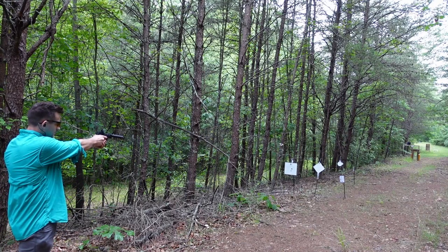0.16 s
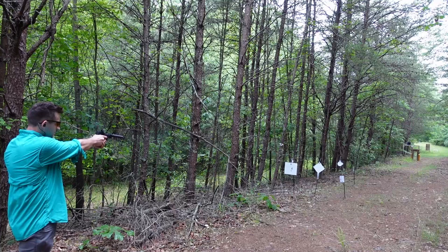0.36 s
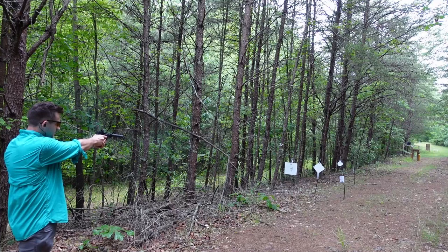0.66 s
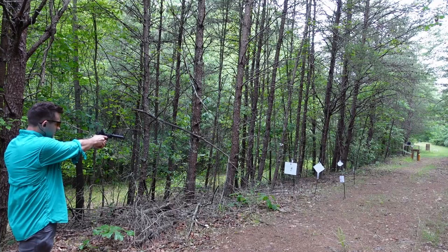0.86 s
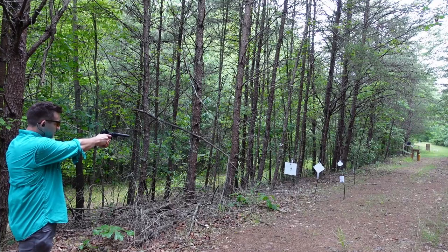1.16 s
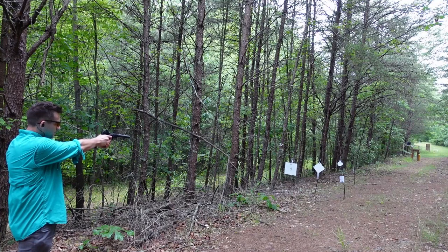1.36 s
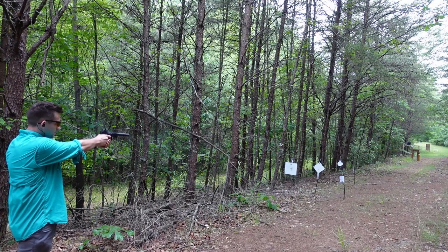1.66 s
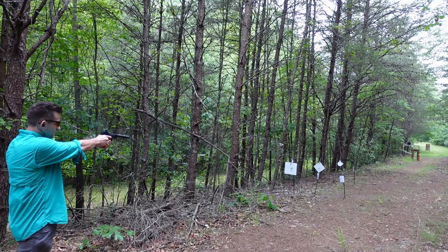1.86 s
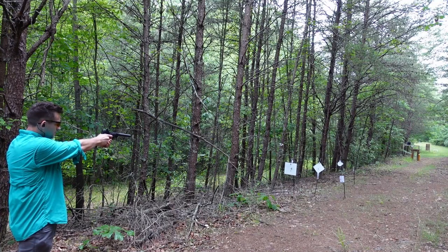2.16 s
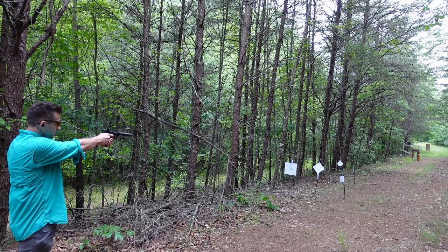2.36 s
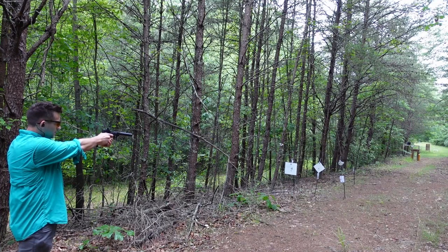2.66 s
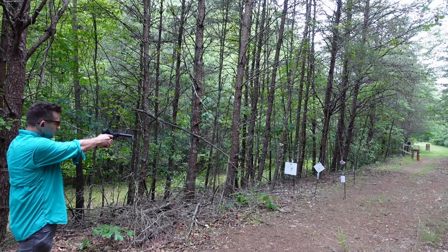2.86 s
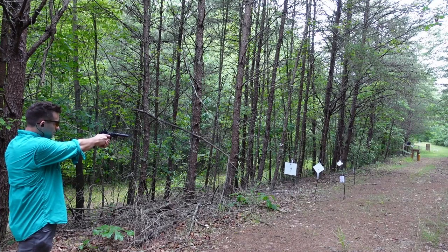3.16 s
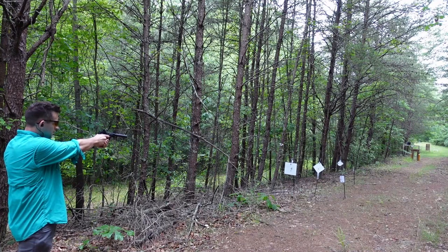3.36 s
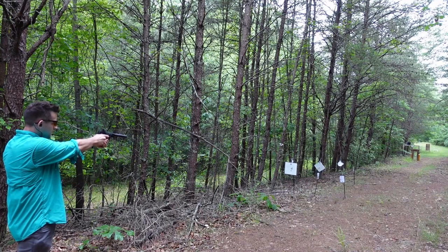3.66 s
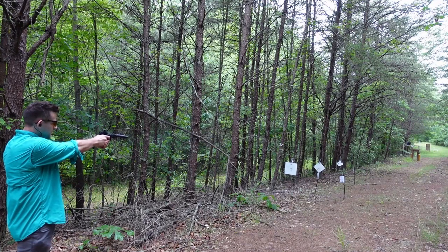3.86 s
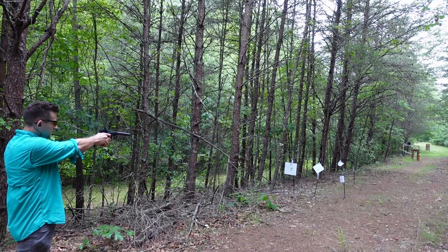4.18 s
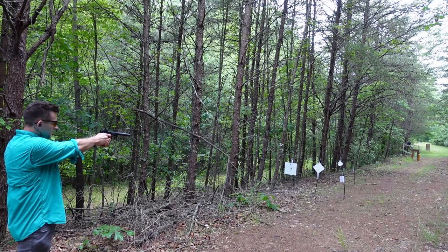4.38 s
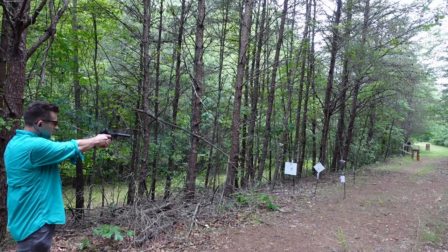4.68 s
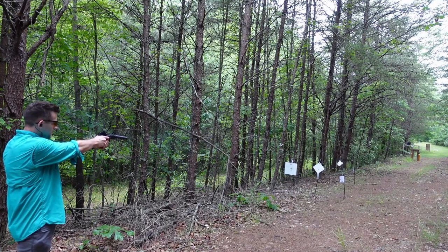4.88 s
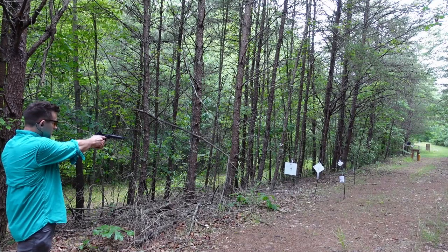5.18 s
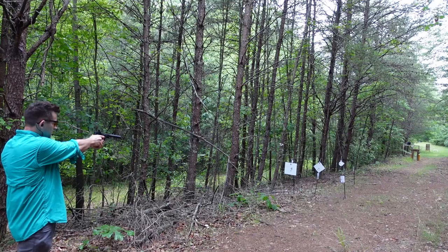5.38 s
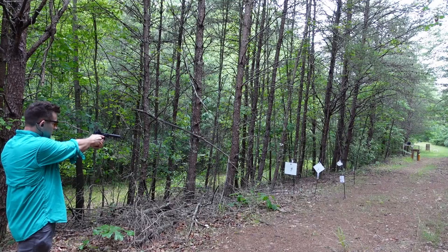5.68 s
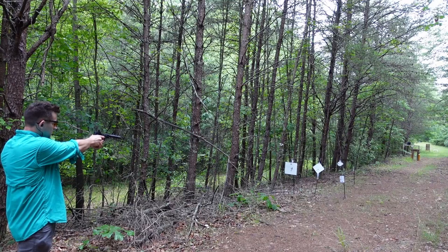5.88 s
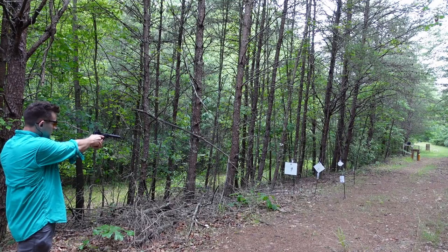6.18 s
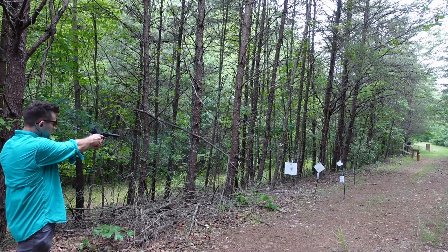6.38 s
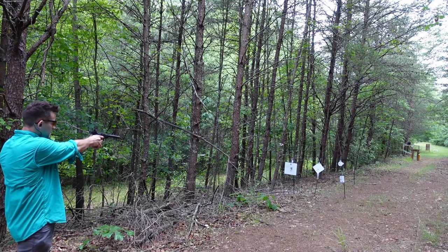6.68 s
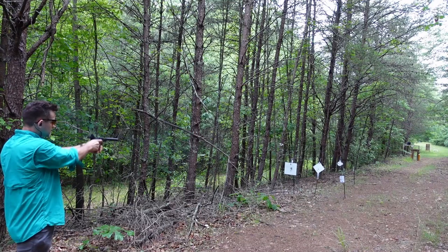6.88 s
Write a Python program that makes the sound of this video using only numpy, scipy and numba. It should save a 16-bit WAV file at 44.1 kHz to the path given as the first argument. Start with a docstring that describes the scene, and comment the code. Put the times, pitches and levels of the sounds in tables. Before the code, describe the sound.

Over a light outdoor breeze, nine pistol shots crack and echo among trees, each striking a steel target that rings and fades. The opening pair and the fast final three ring lower and longer; the four slower shots between them ping higher. Faint trigger clicks, a sharp knock and a skipping brass case fill the gaps. The microphone behind the shooter overloads briefly on the shots.

```python
"""First comes the ring of a steel plate and the echo of a pine wood, from a shot fired just before.
A small-bore pistol keeps firing at three hanging plates: the trigger ticks, the shot cracks, the
slide slams shut, and the plate clanks and rings while the trunks scatter the bang. Between shots come
small clicks, one knock and a skipping case, over a soft breeze. A camera behind the shooter clips
on each crack and turns itself down."""
import sys
import numpy as np
from scipy import signal
from scipy.fft import rfft, irfft, next_fast_len
from scipy.io import wavfile
from scipy.ndimage import map_coordinates
from numba import njit

SR = 44100
rng = np.random.default_rng(int(sys.argv[2]) if len(sys.argv) > 2 else 0)


def transcribe(u):
    """Save the signal u as a 16-bit wav file named by the first command-line argument.

    u: samples, shape (n,) or (channels, n), limited to [-1, 1]; the rate is SR.
    q: integer samples, one column per channel.
    """
    v = np.clip(np.atleast_2d(u).T, -1, 1)
    q = np.round(v * 32767).astype(np.int16)
    wavfile.write(sys.argv[1], SR, q)


N = 310023


def amp(db):
    """Turn decibels into a gain."""
    return 10 ** (np.asarray(db) / 20)


def clock(seconds):
    """Sample times from zero."""
    return np.arange(int(seconds * SR)) / SR


def add(track, s, sound):
    """Mix a sound into the track at s seconds."""
    start = round(s * SR)
    part = sound[max(-start, 0):max(N - start, 0)]
    track[max(start, 0):][:len(part)] += part


def noise(colour, size):
    """Noise of strength (rms) 1; the colour table says which pitches are stronger than others."""
    hz, db = np.transpose(colour)
    m = next_fast_len(size)
    gains = amp(np.interp(np.log(np.fft.rfftfreq(m, 1 / SR) + 1), np.log(hz), db))
    x = irfft(rfft(rng.standard_normal(m)) * gains, m)[:size]
    return x / x.std()


def wobble(t, rate):
    """A smooth curve through `rate` random values a second."""
    return map_coordinates(rng.standard_normal(size=4096), [t * rate], order=2, mode="mirror")


def burst(colour, t, t60, hold=0):
    """Noise that stays level for `hold` seconds, then fades by 60 dB every t60 seconds."""
    return noise(colour, len(t)) * amp(-60 * np.maximum(t - hold, 0) / t60)


def ring(tones, t):
    """The fading tones of something struck once."""
    return sum(amp(db - 60 * t / t60) * np.sin(2 * np.pi * hz * t) for hz, t60, db in tones)


# noise colours of a click, the blast, nearby brush and the slide: f/Hz, level/dB
CLICK_COLOUR = [(200, -10), (1500, -5), (4000, -9), (8000, -6.5), (13000, -21.5), (16000, -17.5)]
BLAST_COLOUR = [(30, -4.5), (90, -4), (170, -16.5), (250, 5.5), (400, -10), (900, 1.5), (2500, -8),
                (6500, -0.5), (10000, -4.5), (16000, -37.5)]
BRUSH_COLOUR = [(60, -14), (300, 7.5), (900, 6.5), (2500, 6.5), (6500, 4), (10000, -3.5), (16000, -6.5)]
SLIDE_COLOUR = [(50, -30), (300, -16), (900, 5.5), (3000, 5), (7000, -15.5), (11000, -40), (16000, -30.5)]
# the shots: t/s, blast level/dB, echo level/dB, plate aimed at, spot struck (0-2), hit level/dB
SHOTS = [(-.165, -7.5, 6, "square", 0, -7.5), (0.2288, 2, 5, "square", 1, -1),
         (.660, 3.5, 8, "square", 2, -2.5), (1.6836, -4, 6, "diamond", 0, -2.5),
         (2.660, -2, 5, "small", 0, -0.5), (3.541, -3.5, 4.5, "diamond", 1, -1.5),
         (4.5175, -2, 4.5, "small", 1, -6), (5.6641, -1.5, 5.5, "square", 0, -11.5),
         (6.0423, -1, 3.5, "square", 1, -1.5), (6.3552, -2, 1, "square", 2, -10.5)]


def pistol(blast_db=13, ground_db=9, brush_db=-7, forest_db=-5, striker_db=-18):
    """The striker clicks, gas bursts from the barrel, and ground, brush and trees throw the bang back."""
    out, t = np.zeros(N), clock(0.5)
    for s, db, echo_db, *_ in SHOTS:
        add(out, s - 0.0024, amp(striker_db) * burst(CLICK_COLOUR, t, t60=0.03))
        add(out, s, amp(db + blast_db) * burst(BLAST_COLOUR, t, t60=0.013, hold=0.0017))
        add(out, s + 0.0027, amp(db + ground_db) * burst(BLAST_COLOUR, t, t60=0.013, hold=0.00074))
        add(out, s + 0.003, amp(db + brush_db) * burst(BRUSH_COLOUR, t, t60=0.31))
        for delay in (0.0228, 0.0252):  # the slide picks up the next round, then slams shut
            add(out, s + delay, burst(SLIDE_COLOUR, t, t60=0.016))
        add(out, s, amp(echo_db + forest_db) * forest(clock(3)))
    return out


# noise colour of the wood's echo: f/Hz, level/dB
FOREST_COLOUR = [(60, -36), (260, -25), (450, -6), (800, -1.5), (1400, 2.5), (3000, 2), (6500, 7),
                 (10000, 4), (16000, -7)]
# thick trunks, each with a slap of its own: t/s after the shot, level/dB above the other echoes
THICK_TRUNKS = [(.132, 3.5), (.159, 10), (0.183, 6), (0.32, 2)]


def forest(t, rise_s=0.019, thinning_s=0.076, tree_line_s=0.19, slap_s=0.00396, air_db_per_khz_s=9.5):
    """Echoes from countless trunks swell, then thin out while the air soaks up the treble."""
    hz, when, spectrum = signal.stft(noise(FOREST_COLOUR, len(t)), SR, nperseg=256)
    air_loss = amp(-air_db_per_khz_s * hz[:, None] / 1000 * when)
    echoes = signal.istft(spectrum * air_loss, SR, nperseg=256)[1][:len(t)]
    swell = 1 - np.exp(-t / rise_s)
    fade = (1 + (t / thinning_s) ** 6) ** (-0.94 / 6)
    bumps_db = wobble(t, rate=300) + np.exp(-((t - tree_line_s) / 0.049) ** 2)
    for delay, db in THICK_TRUNKS:
        bumps_db += db * (t > delay) * np.exp(-np.abs(t - delay) / slap_s)
    return echoes * swell * fade * amp(bumps_db)


# the tones of each plate: f/Hz
SQUARE_HZ = [614.5, 890.0, 1220.0, 1545.0, 1571.5, 1954.5, 2630.0, 3093.5, 3780.0, 4173.0, 4891.0, 4977.0,
             5322.0, 5926.5, 5981.0, 6815.5, 7178.0, 7259.5, 7370.0, 8348.0, 8688.0, 8724.0, 9375.0, 9917.0,
             10338.0, 11063.0, 12180.0, 12902.0, 13335.0, 13558.0, 14906.0, 15520.0]
DIAMOND_HZ = [1180.0, 1359.5, 1362.0, 1951.0, 3343.0, 3387.0, 3459.0, 3772.0, 4238.0, 5586.0, 5605.0,
              6221.0, 6512.0, 6925.0, 7006.0, 7922.0, 8429.0, 8721.0, 10022.0, 10997.0, 11078.0, 12350.0,
              14812.0, 15499.0]
SMALL_HZ = [3000, 4180, 9525, 9540]
# how those tones ring (the shortest is the clank): fade t60/s, then level/dB for each spot struck
SQUARE_RING = [(5.09, -5, -22, -11), (6.54, -16.5, -47.5, -28.5), (0.0054, 21, 24, 27),
               (1.43, 7, -3, -13.5), (1.31, -6, -12, -10), (1.06, -4, -3.5, -18.5),
               (1.56, -11, -17.5, -29.5), (0.8, 0, -11, -1), (0.89, -39, -12.5, -39), (0.86, -6, -16, -5.5),
               (0.54, 7, -1.5, -11.5), (0.79, -9, -9.5, -10.5), (0.8, -14, -8.5, -13), (0.58, 6, 2, -5.5),
               (.38, -16, -9, -5), (0.71, 0, -27, -3.5), (.55, -21, -25, -6), (0.71, -9, -3.5, -14),
               (0.59, -23, -17, -3.5), (.52, 3.5, -13.5, 8.5), (.39, 20, 0, -2.5), (0.65, -13, -17, -6),
               (0.6, -2, -25, -8), (0.36, 4, -12.5, -19.5), (0.66, -17.5, -10.5, -18),
               (0.5, -0.5, -15, -14), (0.52, -4.5, -7.5, -26), (.5, -19.5, -20.5, -7.5),
               (0.3, 10.5, -21, -28), (.44, 14, -12.5, -9), (.43, -25.5, -16.5, -6.5), (0.25, 7, -8, -26.5)]
DIAMOND_RING = [(0.0048, 27, 17), (2.04, -25.5, -30), (0.24, 10, -5.5), (1.02, -17.5, -19), (0.64, -1, -9),
                (0.79, -9.5, -7), (1.11, -15, -26), (0.4, -20, -11), (0.65, -13.5, -7.5), (0.78, -3.5, -17),
                (0.64, -13, -13.5), (0.37, -24.5, 0.5), (0.71, -8, -10.5), (0.5, -11, 2.5), (.6, -10, -23),
                (0.71, -7, -13.5), (0.43, -7, -1.5), (.55, -7, -5), (0.52, -11.5, -13.5), (0.48, -20.5, -6),
                (0.63, -9.5, -23), (0.46, -3, -7.5), (0.41, -6, -14), (0.46, -10, -19)]
SMALL_RING = [(0.0031, 20.5, 6), (0.32, -14, -3.5), (0.09, 5.5, 8.5), (0.69, -19, -18)]
# noise colour of a bullet slapping steel: f/Hz, level/dB
SLAP_COLOUR = [(30, -32.5), (250, -44), (600, 2.5), (1200, -7.5), (2200, -3.5), (8000, -13), (16000, -13)]
FLIGHT_S = 0.0344  # the bullet flies out and the sound of its hit comes back
SWING_S, SWING_DB = 0.57, 4.5  # a struck plate turns away and back; its treble dips meanwhile


def plate(name, pitches, rings, level_db, echo_db, slap_db, shimmer_db, flutter_db, sway_db=2.3):
    """Each bullet slaps the steel and feeds its tones; the spot it hits sets how much each one gets."""
    hits = [(s + FLIGHT_S, spot, db) for s, _, _, aim, spot, db in SHOTS if aim == name]
    out, time, t = np.zeros(N), np.arange(N) / SR, clock(0.5)
    slow = time[::16]  # loudness needs fewer time steps than the wave
    for hz, (t60, *spot_db) in zip(pitches, rings):
        beaming = min(hz / 4200, 1) ** 2  # high tones leave in a beam, low ones spread all round
        energy = np.zeros(len(slow))
        for s, spot, db in hits:
            age = np.maximum(slow - s, 0)
            turned_db = beaming * SWING_DB * np.sin(np.pi * age / SWING_S) ** 2
            energy += (slow > s) * amp(db + spot_db[spot] - turned_db - 60 * age / t60) ** 2
        sway = amp(sway_db * beaming * wobble(slow, rate=22))  # the plate rocks
        flutter = 1 + beaming * amp(flutter_db) * wobble(slow, rate=70)  # trunks scatter the tone
        loudness = amp(level_db) * np.sqrt(energy) * sway * flutter
        out += np.interp(time, slow, loudness) * np.sin(2 * np.pi * hz * time)
    add(out, 0.185, amp(echo_db) * out * np.minimum(time / 0.0085, 1))  # the tree line returns the ring
    for s, _, db in hits:
        add(out, s, amp(db + slap_db) * burst(SLAP_COLOUR, t, t60=0.014, hold=0.0005))
        add(out, s, amp(db + shimmer_db) * shimmer(t))
    return out


def shimmer(t, low_hz=3500, high_hz=14500, t60=0.13, tilt_db=-6, count=80):
    """The crowd of weak, short, high tones that each hit stirs up in a plate."""
    tones = [(low_hz + height * (high_hz - low_hz), t60, tilt_db * height - 10 * weakness)
             for height, weakness in rng.uniform(size=(count, 2))]
    return ring(tones, t)


# noise colours of the rustle and the rumble: f/Hz, level/dB
RUSTLE_COLOUR = [(20, -20.5), (85, -5), (170, -8.5), (300, 2), (900, -7.5), (1800, -6.5), (3500, -21.5),
                 (6000, -20.5), (10000, -28), (16000, -43)]
RUMBLE_COLOUR = [(20, -15), (45, 5), (85, 6.5), (170, -3.5), (400, -43.5), (16000, -97)]
# the rumble's slow rise and fall: t/s, level/dB
RUMBLE_LEVEL = [(0, -46.5), (1.2, -48), (2.3, -46), (3.3, -49.5), (5.2, -52.5), (7, -60)]


def breeze(rustle_db=-45, gust_db=-2.5):
    """Open air rustles softly and evenly over a low rumble that comes and goes."""
    time = np.arange(N) / SR
    rumble_db = np.interp(time, *np.transpose(RUMBLE_LEVEL)) + gust_db * wobble(time, rate=62)
    return amp(rustle_db) * noise(RUSTLE_COLOUR, N) + amp(rumble_db) * noise(RUMBLE_COLOUR, N)


# the trigger resets and the grip shifts between shots: t/s, level/dB
HAND_CLICKS = [(1.287, -26.5), (2.381, -24.5), (2.434, -32), (4.1172, -28), (5.1605, -25), (5.6074, -31.5)]


def handling(boost_db=3.5, echo_db=-24, fidget_count=30):
    """Trigger and grip click, echoed by the trees; the trigger ticks before shots and hands fidget."""
    out, t = np.zeros(N), clock(0.5)
    for s, db in HAND_CLICKS:
        click = burst(CLICK_COLOUR, t, t60=0.0099)
        echo = amp(echo_db) * burst(CLICK_COLOUR, t, t60=0.18)
        add(out, s, amp(db + boost_db) * (click + echo))
    trigger_ticks = [(s - 0.023, -31) for s, *_ in SHOTS]  # t/s, level/dB
    fidgets = [(rng.uniform(0, N / SR), rng.normal(-38, 4)) for _ in range(fidget_count)]
    for s, db in trigger_ticks + fidgets:
        add(out, s, amp(db + boost_db) * burst(CLICK_COLOUR, t, t60=0.0094))
    return out


# hits that overload the microphone: t/s, level/dB
THUMPS = [(0.6946, 6.5), (1.721, -10), (3.575, -33.5), (4.552, -18)]


def microphone_thumps(swing_hz=13, swing_t60=0.3, push_t60=0.036):
    """The overloaded microphone gives a low thump, then its pressure swings slowly back."""
    out, t = np.zeros(N), clock(0.5)
    for s, db in THUMPS:
        push = amp(-60 * t / push_t60) * (1 - np.exp(-t / 0.0017))
        swing = ring([(swing_hz, swing_t60, 0)], t)
        add(out, s, amp(db) * (3.6 * push - 0.5 * swing))
    return out


# the knock: t/s, level/dB
KNOCKS = [(3.2465, -9)]
# noise colour of its crack: f/Hz, level/dB
KNOCK_COLOUR = [(100, -42), (700, -36), (1200, -1.5), (2200, -6.5), (6000, -9), (11000, -12.5),
                (16000, -16)]
# its tones: f/Hz, fade t60/s, level/dB
KNOCK_TONES = [(1300, 0.036, -8), (5900, 0.033, -40), (12300, 0.18, -28)]


def knock():
    """One hard knock near the microphone cracks, rings briefly and scatters off the brush."""
    out, t = np.zeros(N), clock(0.5)
    for s, db in KNOCKS:
        crack = amp(2) * burst(KNOCK_COLOUR, t, t60=0.0027, hold=0.0029)
        echo = amp(-24.5) * burst(BRUSH_COLOUR, t, t60=0.38)
        add(out, s, amp(db) * (crack + ring(KNOCK_TONES, t) + echo))
    return out


# the case's landings: t/s, level/dB
CASE_HITS = [(5.2858, -27), (5.326, -36)]
# its tones: f/Hz, fade t60/s, level/dB
BRASS_TONES = [(2340, 0.012, 9), (2730, 0.096, -4), (4151, 0.073, -8), (5080, 0.076, -8), (6970, .3, -21)]


def spent_case():
    """An empty brass case lands and skips, clinking each time."""
    out, t = np.zeros(N), clock(0.5)
    for s, db in CASE_HITS:
        add(out, s, amp(db) * (ring(BRASS_TONES, t) + 0.5 * burst(SLIDE_COLOUR, t, t60=0.03)))
    return out


def scene():
    """Pistol, plates and the quiet wood, mixed into one channel."""
    steel = plate("square", SQUARE_HZ, SQUARE_RING,
                  level_db=3, echo_db=-31.5, slap_db=22, shimmer_db=-3, flutter_db=-10.5)
    steel += plate("diamond", DIAMOND_HZ, DIAMOND_RING,
                   level_db=3.5, echo_db=-29.5, slap_db=10.5, shimmer_db=-27.5, flutter_db=-6.5)
    steel += plate("small", SMALL_HZ, SMALL_RING,
                   level_db=1.5, echo_db=-42.5, slap_db=9, shimmer_db=-22, flutter_db=-10.5)
    return (pistol() + steel + microphone_thumps() + handling() + spent_case() + knock() + breeze())[None]


@njit
def turn_down(over_db, attack_s, release_db_per_s, cut_db):
    """The camera's volume cut in dB: it grows fast while the sound is too loud, then eases steadily."""
    out = np.zeros(len(over_db))
    for i in range(len(over_db)):
        rise_db = max(over_db[i] - cut_db, 0.0) / (attack_s * SR)
        cut_db = max(cut_db + rise_db - release_db_per_s / SR, 0.0)
        out[i] = cut_db
    return out


def record(dry, limit_db=-6.5, ceiling=0.82, top_hz=16100):
    """The camera starts turned down, reacts too late so that cracks clip, and drops the top treble."""
    over_db = 20 * np.log10(np.abs(dry[0]) + 1e-9) - limit_db
    cut_db = turn_down(over_db, attack_s=0.0018, release_db_per_s=100, cut_db=12.0)
    clipped = np.clip(dry[0] * amp(-cut_db), -ceiling, ceiling)
    m = next_fast_len(N + SR)
    low_pass = 1 / (1 + (np.fft.rfftfreq(m, 1 / SR) / top_hz) ** 200)
    return irfft(rfft(clipped, m) * low_pass, m)[None, :N]


dry = scene()
out = record(dry)
transcribe(out)
```